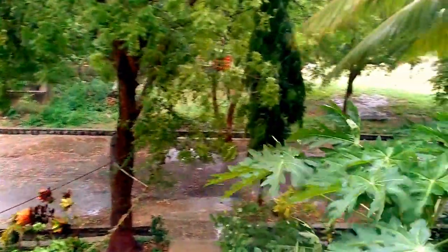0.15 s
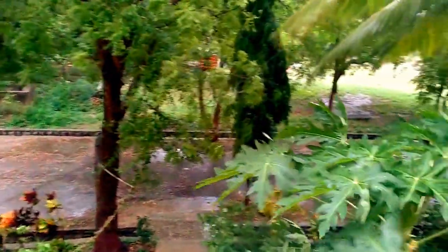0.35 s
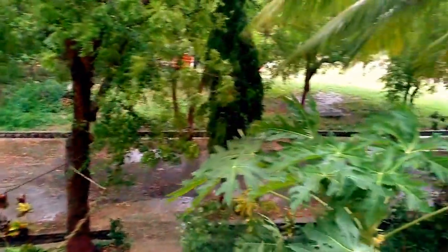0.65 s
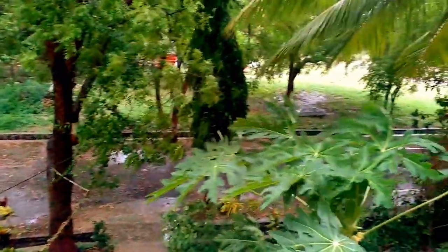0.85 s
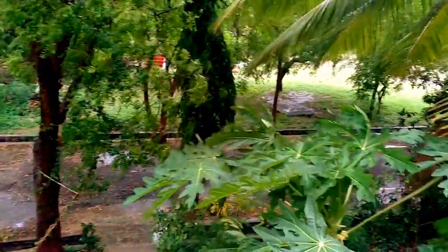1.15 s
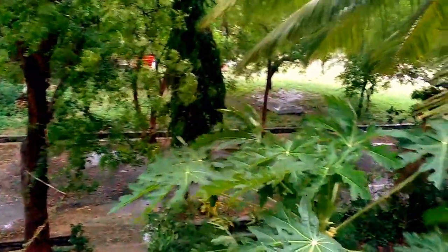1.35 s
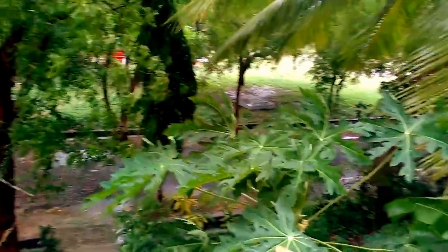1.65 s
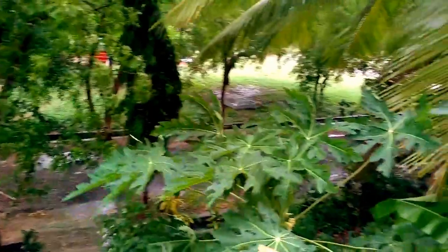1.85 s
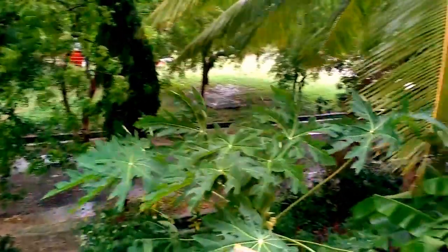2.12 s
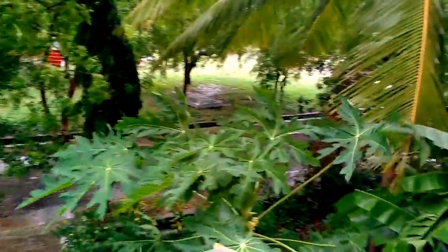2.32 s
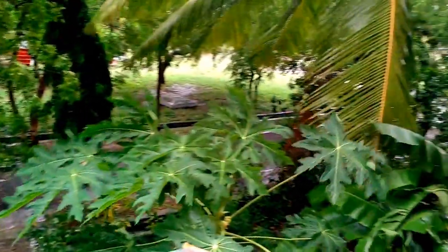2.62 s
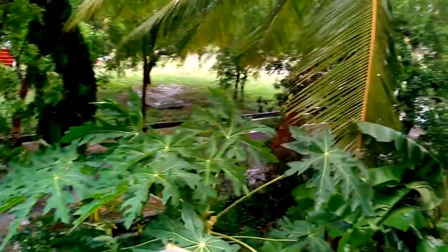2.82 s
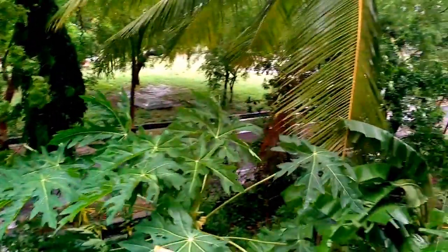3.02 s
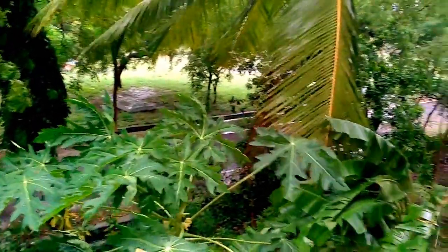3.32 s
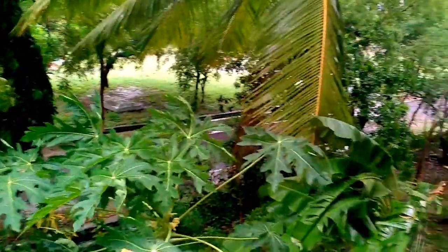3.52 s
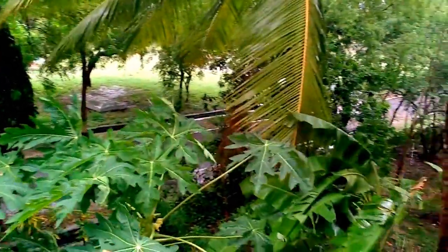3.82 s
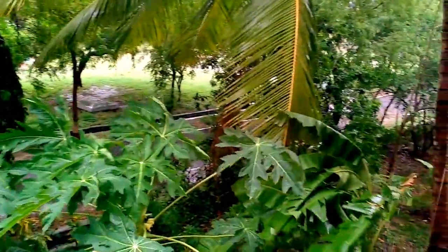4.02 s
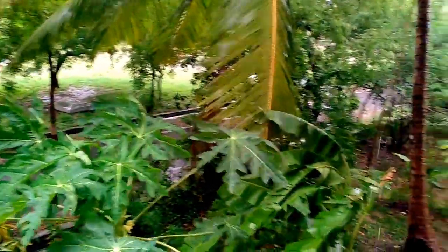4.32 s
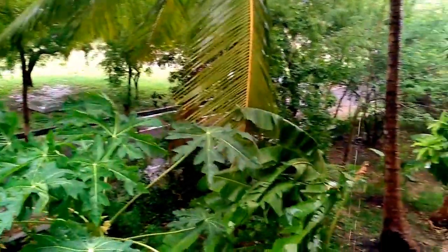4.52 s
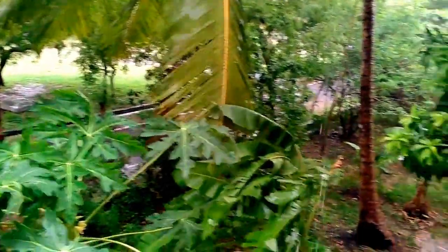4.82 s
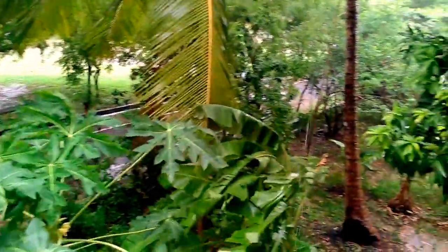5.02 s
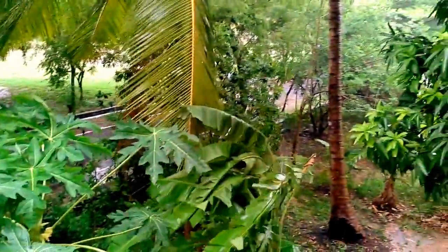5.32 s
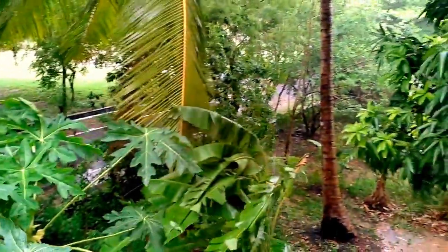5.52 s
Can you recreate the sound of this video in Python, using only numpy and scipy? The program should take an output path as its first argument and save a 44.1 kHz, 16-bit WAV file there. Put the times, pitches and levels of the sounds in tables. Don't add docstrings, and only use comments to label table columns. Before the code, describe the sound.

Heavy rain hisses steadily over broad garden leaves and wet ground, with close drops thudding on foliage and soft wind buffeting the microphone.

```python
import sys
import numpy as np
from scipy import signal
from scipy.fft import rfft, irfft, next_fast_len
from scipy.io import wavfile
from scipy.ndimage import uniform_filter1d

SR = 44100
rng = np.random.default_rng(int(sys.argv[2]) if len(sys.argv) > 2 else 0)


def magnitude_from_level(level_db):
    exponent = np.asarray(level_db, float) / 20
    return 10 ** exponent


def bounce(signal):
    frames = np.transpose(np.atleast_2d(signal))
    limited = np.clip(frames, -1, 1)
    pcm = np.round(limited * 32767).astype(np.int16)
    wavfile.write(sys.argv[1], SR, pcm)


N = 249606

# (frequency [Hz], level per hertz [dB])
WASH_SPECTRUM = [(20, -13), (45, -8.5), (150, 6), (300, -0.5), (600, -2), (900, -3), (1300, -1),
                 (1900, 1.5), (2300, -2), (3500, -10.5), (6000, -9.5), (9000, -13), (12000, -12.5),
                 (16000, -13.5)]
# (frequency [Hz], correlation [-1..1])
PORT_LIKENESS = [(40, 0.96), (200, 0.96), (600, 0.77), (1200, 0.23), (1900, -0.2), (2600, 0.058),
                 (5000, -0.054), (15000, -0.089)]
# (time [s], peak level [dB], pitch [Hz])
LEAF_THUDS = [(0.068, -22, 1190), (0.584, -20, 1560), (0.872, -14, 1270), (0.931, -6.5, 1550),
              (1.138, -7.5, 1520), (1.225, -8, 1660), (1.254, -16, 874), (1.401, -14, 775),
              (1.773, -12, 1280), (2.132, -18, 825), (2.296, -16, 760), (2.784, -9, 1730),
              (2.983, -10, 1570), (3.033, -11, 890), (3.324, -9, 1230), (3.331, -17.5, 1240),
              (3.337, -12, 999), (3.349, -13, 600), (3.397, -10.5, 1350), (3.419, -9, 1540),
              (3.577, -10, 1620), (3.606, -13, 993), (3.859, -12.5, 850), (3.937, -16, 1270),
              (4.366, -11.5, 710), (4.543, -6, 1740), (4.871, -18, 660), (5.038, -16.5, 1250),
              (5.134, -27, 1340)]
# (time [s], left port level [dB], right port level [dB], pitch [Hz], length [ms])
CASING_TICKS = [
    (2.3439, -29, -5, 13800, 0.73),
    (2.3447, -30, -20, 13000, .8),
    (3.9602, -8.5, -7.5, 6100, 0.89),
    (5.174, -20, -12.5, 6700, 0.75),
]
# (time of peak [s], peak level [dB], fading time [s])
GUST_PUFFS = [(0.0, -23, .08), (.16, -23, 0.065), (1.83, -31, .1), (1.93, -18.5, 0.3), (2.08, -26, 0.037),
              (2.13, -40, 0.071), (2.32, -28, 0.14), (2.45, -26, 0.055), (2.55, -25, 0.054),
              (2.63, -34, .06), (2.73, -32, .04), (2.86, -28, 0.12), (3.01, -29, .06), (2.95, -32.5, .05),
              (3.35, -36, .06), (3.42, -32, .04), (3.5, -26.5, 0.041), (3.6, -20.5, 0.022),
              (3.655, -24, 0.016), (3.7, -28, 0.018), (4.23, -32, .03), (4.645, -19, 0.036),
              (4.7, -28, 0.061), (4.82, -18, 0.035), (4.92, -31, .02), (4.965, -27, .02), (5.0, -19, 0.033),
              (5.64, -30, .04)]
# (frequency [Hz], level per hertz [dB])
WIND_SPECTRUM = [(10, -30), (30, -10), (60, 4), (100, 6), (160, 2), (250, -17), (400, -18), (800, -52)]
# (time [s], swell [dB], length [s])
LEAF_SHEDS = [(0.426, 0.5, 0.047), (.92, 0, 0.073), (1.137, 0.4, 0.11), (1.33, 0.5, 0.29), (2.152, 2, .1),
              (2.287, 1, 0.068), (2.782, 2, 0.095), (2.865, 2.5, .08), (3.003, 3, .1), (3.123, 1.5, 0.063),
              (3.237, 1, 0.093), (3.345, 0.5, 0.052), (3.41, -0.5, 0.055), (3.498, 2, 0.088),
              (4.386, 1.2, 0.12), (4.57, 2.5, 0.039), (4.646, 2.5, 0.13), (5.05, 3.5, 0.12),
              (5.138, 3.5, 0.036)]
# (time [s], step [dB])
GAIN_DIPS = [(0.0, 2.5), (0.2, 1.44), (1.72, 1.26), (1.865, 3), (2.0, 3), (2.198, 2), (2.345, 5.5),
             (2.44, 0.5), (3.05, -0.5), (3.44, 3), (3.6, 0), (3.962, 5.5), (4.56, 3), (4.66, 1.46),
             (4.82, 2.5), (5.01, 1), (5.176, 4.5), (5.3, 0)]
# (frequency [Hz], level [dB])
CROSS_PORT = [(60, -3.5), (1000, -2.5), (3000, -4), (6000, -8), (10000, -13), (15000, -15.5)]
# (frequency [Hz], level [dB])
LEFT_COLOUR = [(60, -2), (500, -2.5), (2000, -1.2), (2600, -2), (3700, -.5), (5000, -3.2), (7000, -3.6),
               (8500, -.5), (11000, -6.5), (13000, -10), (14300, -14), (15400, -24)]
# (frequency [Hz], level difference [dB])
WEAK_LIMIT = [(500, 60), (1200, 17), (2150, 15), (2450, 9.5), (2800, 15), (3700, 9.5), (5000, 9),
              (6200, 11), (7400, 7.5), (8700, 9), (10000, 13), (13000, 20)]
BAND_STARTS = [0, 40, 48, 56, 64, 72, 80, 88, 96, 108, 120, 132, 144, 160, 176, 196, 216, 240, 264, 292] + list(range(320, 1024, 32))

GAP_S = 18 / 44100
DRONE_FROM_S, DRONE_SWELL_S, DRONE_DB = 2.82, 0.55, -43.5
DRONE_HZ, DRONE_CLIMB_HZ_PER_S = 40.3, 0.66
GUST_RISE_S, GUST_FADE_DB = 0.012, -13.5
WIND_DB, BREEZE_DB = -5.0, -48
RAIN_DB, FIZZ_DB = -23, 2.5
SHED_FIZZ = 0.22
DIP_S, RECOVER_DB_PER_S = 0.019, 9
EDGE_HZ, FRAME_LEAD = 15560, 466


def evened(x):
    return x / np.sqrt(np.mean(x ** 2) + 1e-20)


def read(points, hz):
    f, value = np.transpose(points)
    return np.interp(np.log(hz + 1), np.log(f + 1), value)


def add(mix, s, sound):
    part = mix[round(s * SR):][:len(sound)]
    part += sound[:len(part)]


def blip(hz, turns):
    u = np.arange(int(4 * turns * SR / hz) + 8) * hz / SR / turns
    shape = u * np.exp(1 - 2 * u) * 2 * np.exp(-u * u / 4)
    return shape * np.sin(2 * np.pi * u * turns)


def drone():
    t = np.arange(N) / SR - DRONE_FROM_S
    tone = np.sin(2 * np.pi * np.cumsum(DRONE_HZ + DRONE_CLIMB_HZ_PER_S * t) / SR)
    port_db = np.array([[2], [9]])
    return magnitude_from_level(DRONE_DB + port_db) * np.clip(t / DRONE_SWELL_S, 0, 1) * tone


def wind(shared):
    hz = np.fft.rfftfreq(N, 1 / SR)
    colour = magnitude_from_level(read(WIND_SPECTRUM, hz))
    push, common = (evened(irfft(rfft(noise) * colour, N)) for noise in rng.standard_normal((2, N)))
    t = np.arange(N) / SR
    level = magnitude_from_level(BREEZE_DB)
    for s, db, fade_s in GUST_PUFFS:
        away = np.where(t < s, (s - t) / GUST_RISE_S, (t - s) / fade_s)
        level = level + magnitude_from_level(db + GUST_FADE_DB * away)
    return magnitude_from_level(WIND_DB) * level * np.array([shared * common + 1.3 * push, shared * common - 0.41 * push])


def shed_db(t):
    return sum(db * np.exp(-(2 * (t - s) / length_s) ** 2) for s, db, length_s in LEAF_SHEDS)


def wash(patchy_db, flicker_db):
    frames, hz = N // 128 + 9, np.fft.rfftfreq(512, 1 / SR)
    t = np.arange(frames) * 128 / SR
    a, b, c, d, patches = rng.standard_normal((frames, 257, 5)).T
    patches = uniform_filter1d(patches, size=9, axis=0)
    patches = evened(uniform_filter1d(patches, size=20, axis=1))
    flicker = evened(uniform_filter1d(rng.standard_normal(frames), size=10))
    same = np.clip(read(PORT_LIKENESS, hz), -1, 1)[:, None]
    left, own = a + 1j * b, c + 1j * d
    z = np.array([left, same * left + np.sqrt(1 - same ** 2) * own])
    treble = np.clip(np.log2(hz / 1500 + 1e-9), 0, 1)[:, None]
    fizz_db = (FIZZ_DB - (1 - SHED_FIZZ) * shed_db(t)) * treble
    z *= magnitude_from_level(read(WASH_SPECTRUM, hz)[:, None] + fizz_db + patchy_db * patches + flicker_db * flicker)
    return evened(signal.istft(z, nperseg=512, noverlap=384)[1][:, :N])


def patter(per_s, spread_db, lo_hz, hi_hz, turns, count):
    falls = rng.random(N) < per_s / SR
    size = magnitude_from_level(spread_db * np.minimum(rng.exponential(1, N), 4)) * falls
    patch, out = rng.integers(0, count, N), np.zeros((2, N))
    for k, hz in enumerate(np.geomspace(lo_hz, hi_hz, count)):
        drops = signal.oaconvolve(size * (patch == k), blip(hz, turns))[:N]
        lag = round(rng.uniform(-1, 1) * GAP_S * SR)
        out += [drops, np.roll(drops, lag)]
    return evened(out)


def near_drops():
    out = np.zeros((2, N))
    for s, db, hz in LEAF_THUDS:
        for port in out:
            add(port, s + .001, magnitude_from_level(db - 6) * blip(hz, turns=1.5))
    for s, left_db, right_db, hz, ms in CASING_TICKS:
        for port, db in zip(out, (left_db, right_db)):
            add(port, s - .0003, magnitude_from_level(db) * blip(hz, turns=hz * ms / 3000))
    return out


def gain_db():
    t = np.arange(N) / SR
    pushed = sum(db * np.clip((t - s) / DIP_S + (s < DIP_S), 0, 1) for s, db in GAIN_DIPS)
    owed = pushed - RECOVER_DB_PER_S * t
    return np.minimum.accumulate(np.minimum(owed, 0)) - owed


def scene():
    rain = wash(patchy_db=0.76, flicker_db=0.36)
    rain = rain + magnitude_from_level(-11.0) * patter(500, spread_db=0.0, lo_hz=652, hi_hz=1990, turns=2.6, count=24)
    rain = rain + magnitude_from_level(-18.5) * patter(2500, spread_db=6.5, lo_hz=2510, hi_hz=14000, turns=3.3, count=24)
    rain = magnitude_from_level(RAIN_DB + shed_db(np.arange(N) / SR)) * rain
    return magnitude_from_level(gain_db()) * (rain + drone()) + near_drops() + wind(shared=0.71)


def band_power_db(z, band):
    total = np.add.reduceat(abs(z) ** 2, BAND_STARTS)
    return 10 * np.log10(total / np.bincount(band)[:, None] + 1e-20)[band]


def thin_out(x, quiet_db, mood_db):
    padded = np.pad(x, ((0, 0), (FRAME_LEAD, 0)))
    hz, _, z = signal.stft(padded, SR, window="cosine", nperseg=2048, noverlap=1024)
    band = np.searchsorted(BAND_STARTS, np.arange(len(hz)), "right") - 1
    mood = rng.standard_normal((len(BAND_STARTS), z.shape[2]))
    mood = mood_db * evened(uniform_filter1d(mood, size=3))[band]
    mid, side = z[0] + z[1], z[0] - z[1]
    lead_db = band_power_db(mid, band) - band_power_db(side, band)
    limit_db = mood - read(WEAK_LIMIT, hz[BAND_STARTS][band])[:, None]
    mid, side = mid * (lead_db > limit_db), side * (-lead_db > limit_db)
    left, right = (mid + side) / 2, (mid - side) / 2
    local_db = 10 * np.log10(uniform_filter1d(abs(left) ** 2, size=5, axis=0) + 1e-20)
    audible = local_db - band_power_db(right, band) > mood - quiet_db
    left = left * (audible | (hz < 9000)[:, None])
    kept = np.array([left, right]) * (hz < EDGE_HZ)[:, None]
    out = signal.istft(kept, SR, window="cosine", nperseg=2048, noverlap=1024)[1]
    return out[:, FRAME_LEAD:FRAME_LEAD + N]


def top_cut(x):
    return signal.sosfilt(signal.butter(12, 16160, fs=SR, output="sos"), x)


def record(dry):
    size = next_fast_len(N + 512)
    hz = np.fft.rfftfreq(size, 1 / SR)
    ports = rfft(dry, size)
    delay = np.exp(-2j * np.pi * hz * GAP_S)
    aimed = ports - ports[::-1] * magnitude_from_level(read(CROSS_PORT, hz)) * delay
    aimed[0] *= magnitude_from_level(read(LEFT_COLOUR, hz))
    mix = thin_out(irfft(aimed, size)[:, :N], quiet_db=14.5, mood_db=3)
    return top_cut(mix)


dry = scene()
out = record(dry)
bounce(out)
```